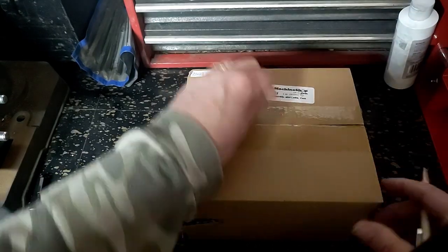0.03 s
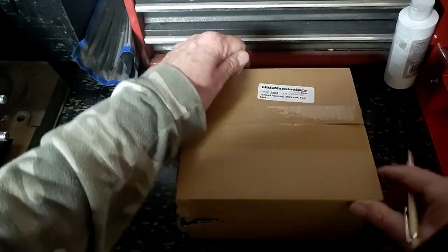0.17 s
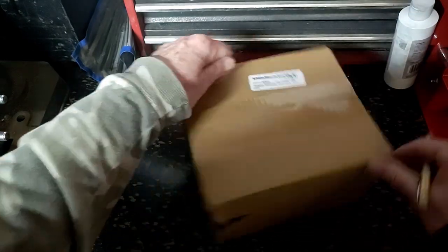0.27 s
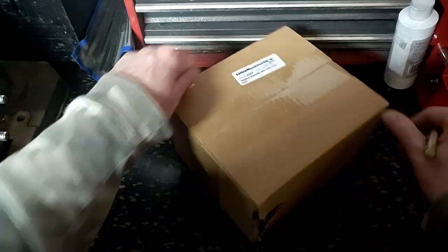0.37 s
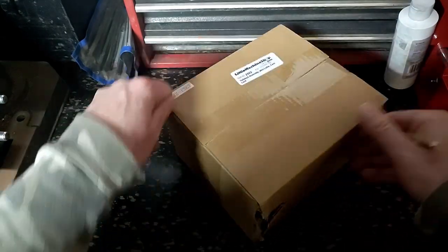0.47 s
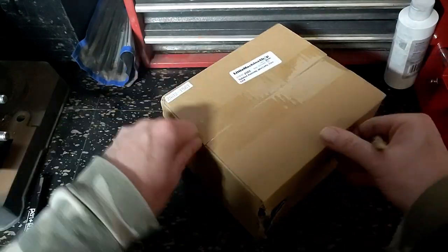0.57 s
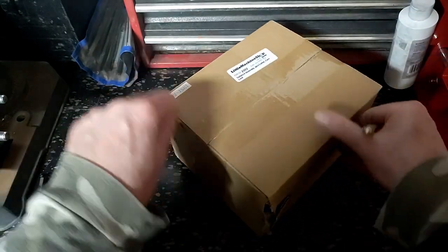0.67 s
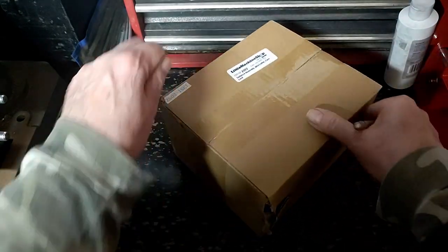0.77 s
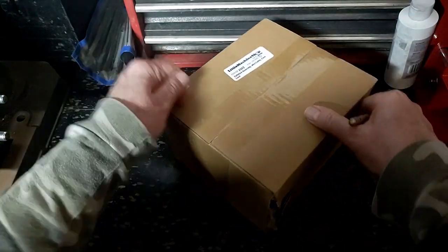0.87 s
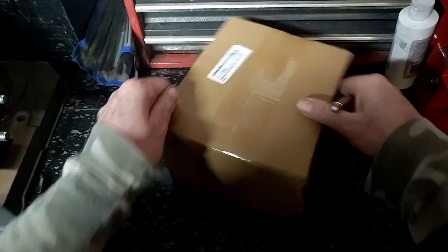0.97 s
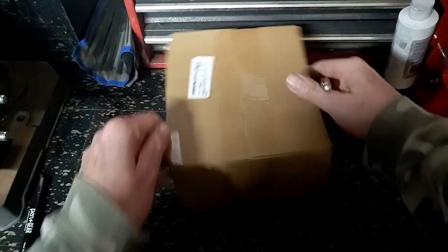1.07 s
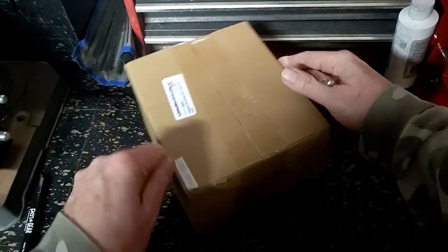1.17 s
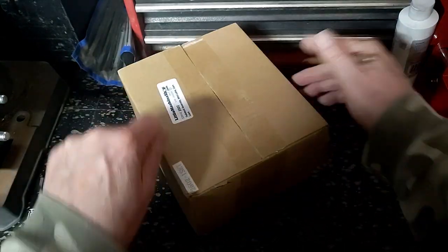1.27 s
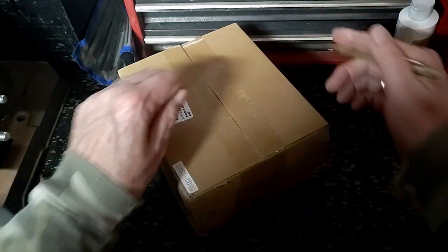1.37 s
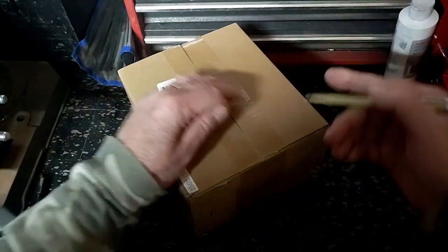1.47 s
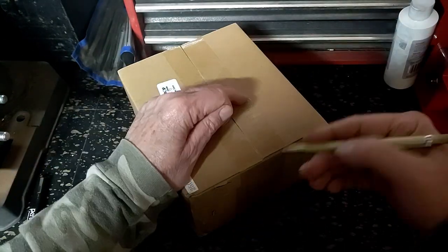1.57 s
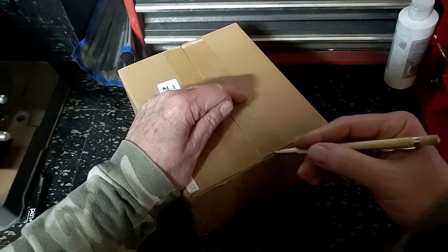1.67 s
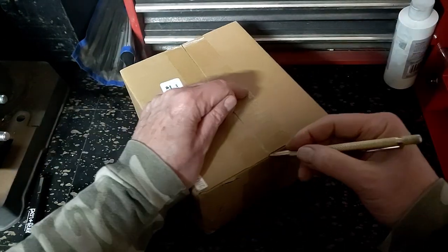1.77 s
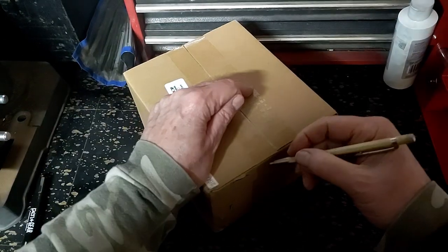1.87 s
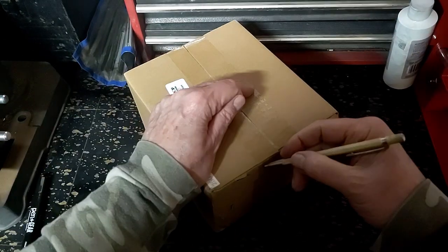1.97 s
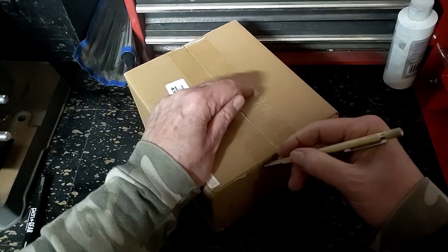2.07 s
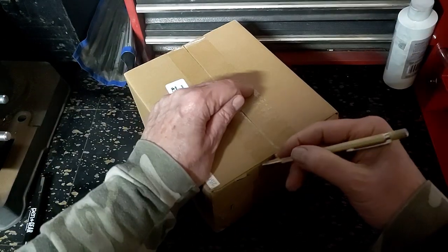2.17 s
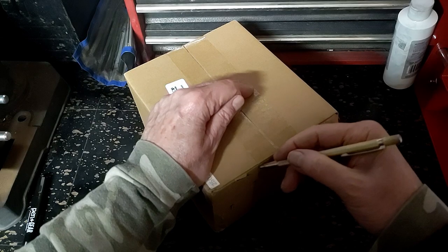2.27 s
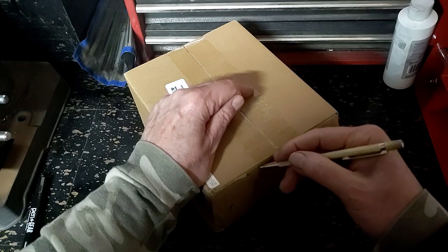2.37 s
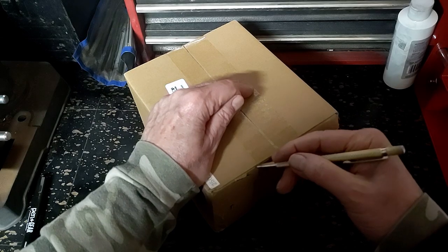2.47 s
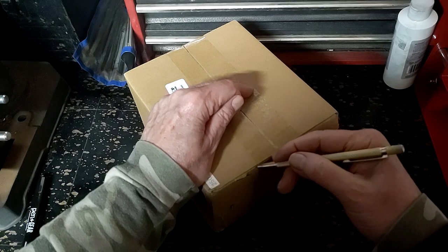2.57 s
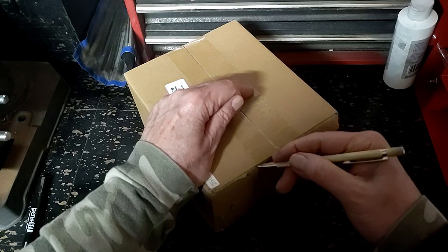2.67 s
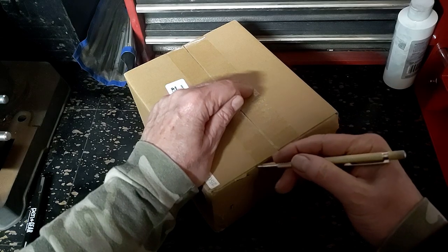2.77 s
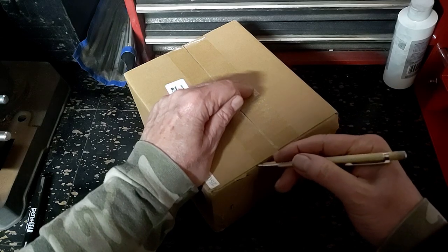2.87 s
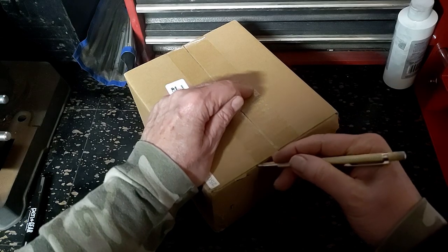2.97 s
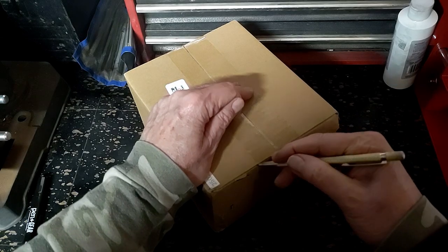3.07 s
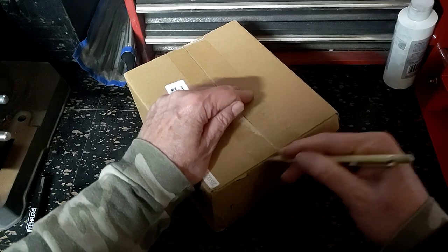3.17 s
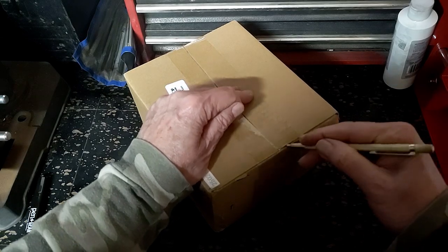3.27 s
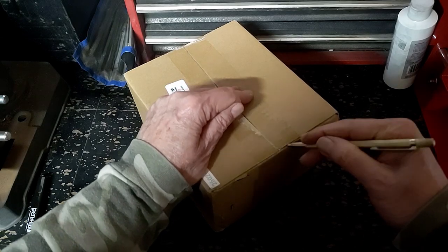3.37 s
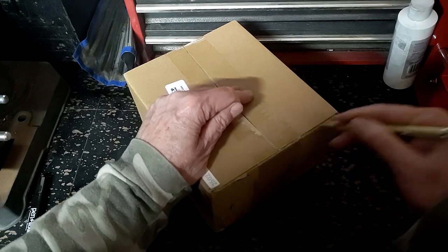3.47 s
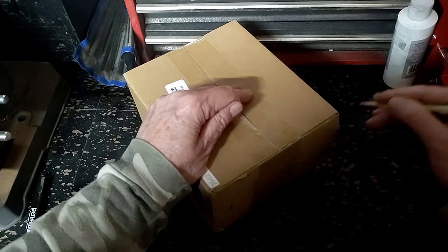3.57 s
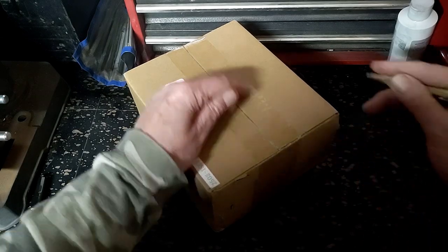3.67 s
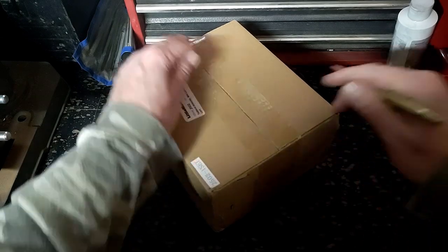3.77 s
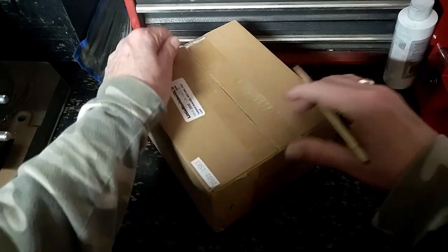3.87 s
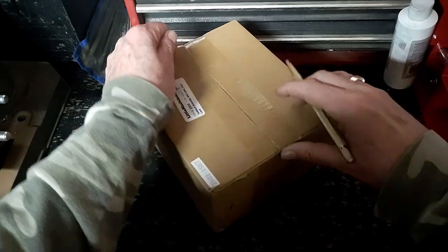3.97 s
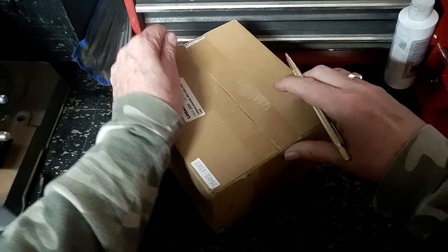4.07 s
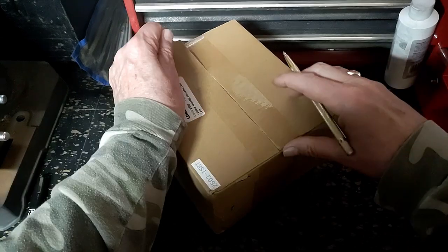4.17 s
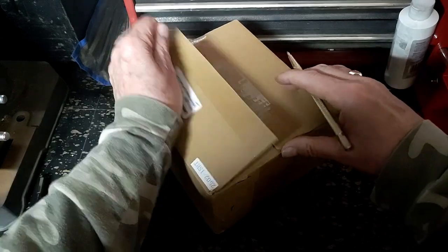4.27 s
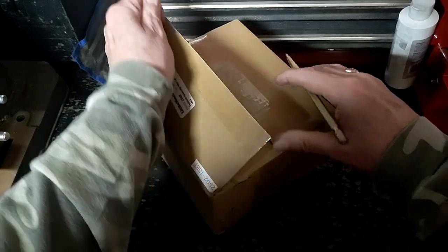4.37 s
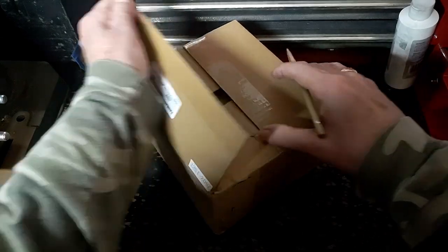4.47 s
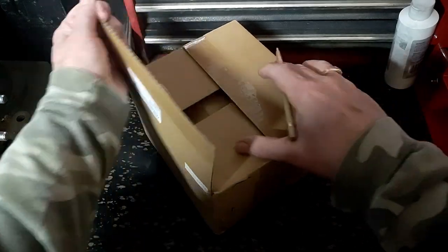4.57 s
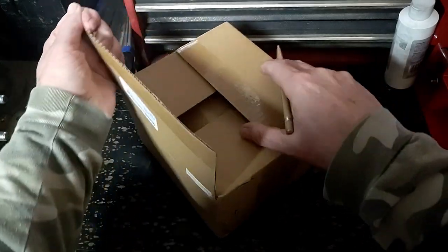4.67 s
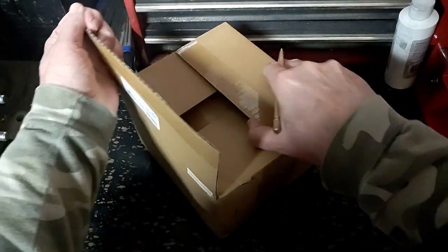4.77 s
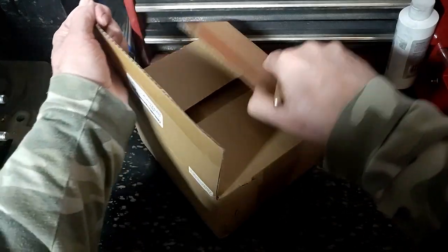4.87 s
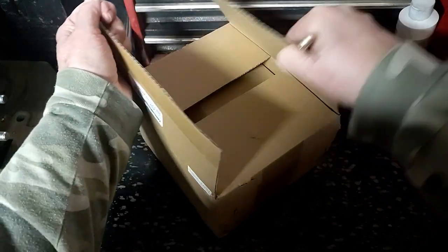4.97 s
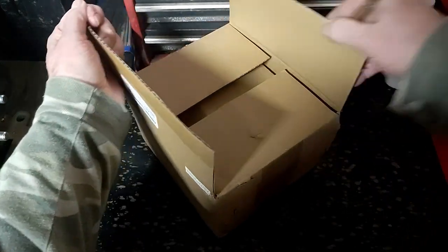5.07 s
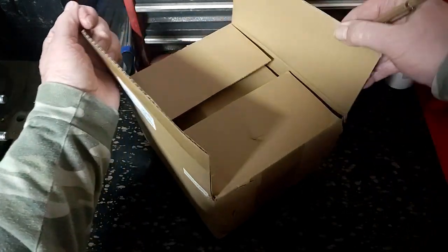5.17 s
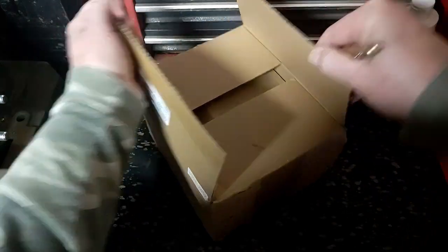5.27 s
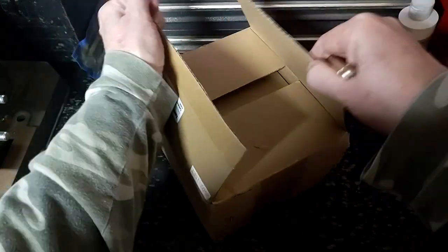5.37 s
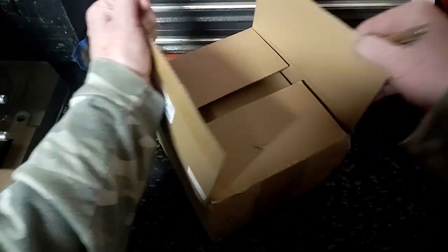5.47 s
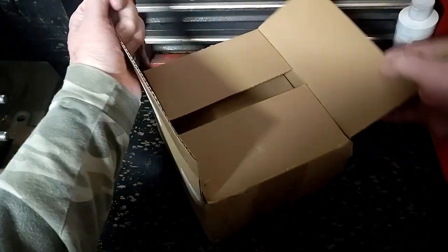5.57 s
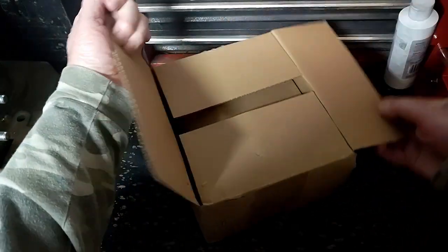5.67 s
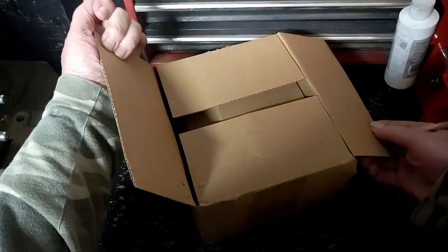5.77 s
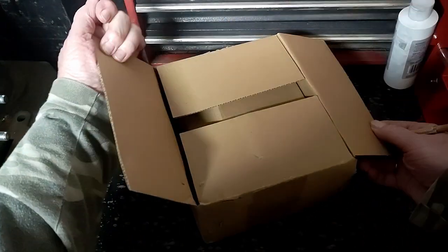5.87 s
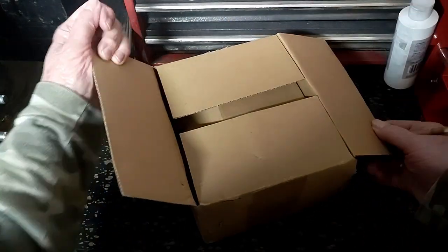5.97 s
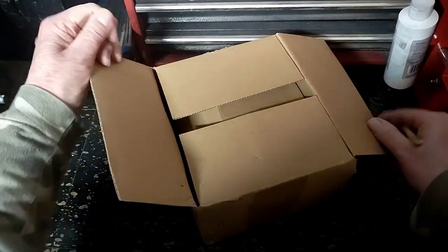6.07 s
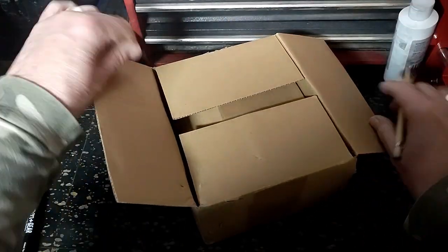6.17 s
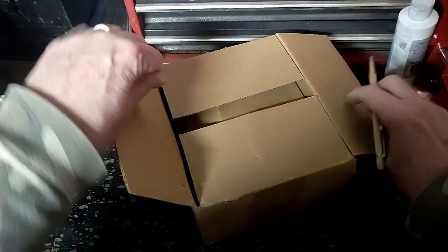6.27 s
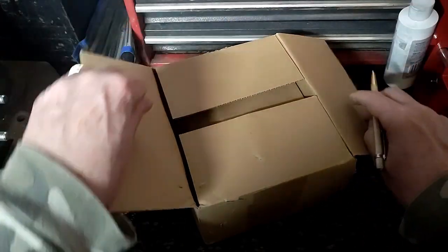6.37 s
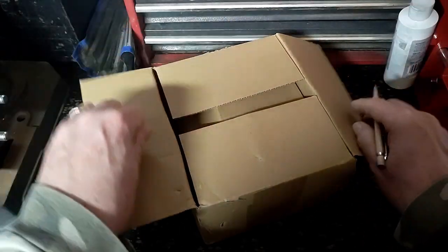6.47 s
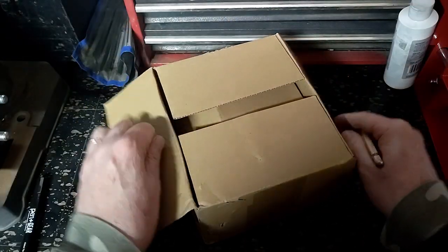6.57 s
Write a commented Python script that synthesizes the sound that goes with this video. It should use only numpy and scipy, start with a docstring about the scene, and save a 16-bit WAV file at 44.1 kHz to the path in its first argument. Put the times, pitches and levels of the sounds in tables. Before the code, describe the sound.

Hands turn a hollow carton on a bench mat: soft knocks and two broad swishing scrapes. Only faint ticks and low hum follow, until a brief grainy tape cut drums on the box. Then comes one bright crack of parting tape, loud cardboard pops as the flaps bend back, and dry skin and sleeve rubbing. Near microphones, short room reflections, treble leaning right.

```python
"""Over mains hum and still air, a cardboard box is knocked and shoved on a rubber mat: its modes ring, noise
hisses. A knife then drags through the packing tape: grainy noise with catches and a boom from the box. The last
strip snaps: bright noise bursts, short ringing and a thump through the open box. The flaps are bent open:
creases pop as decaying modes with cracks, while hands and sleeves rub over the board as shaped friction noise."""
import sys
import numpy as np
from scipy import signal
from scipy.fft import rfft, irfft, next_fast_len
from scipy.io import wavfile
from scipy.ndimage import uniform_filter1d

SR = 44100
rng = np.random.default_rng(int(sys.argv[2]) if len(sys.argv) > 2 else 0)


def int16_out(signal):
    """Quantize to a 16-bit WAV file."""
    q = np.round(np.clip(np.atleast_2d(signal).T, -1, 1) * 32767)
    wavfile.write(sys.argv[1], SR, q.astype(np.int16))


N = 291942

# Closed-box resonances. Each row: frequency in Hz, width in Hz, level in dB.
BOX_MODES = [(128, 27, -14), (186, 22, -5), (245, 47, -8.5), (344, 26, 0), (380, 29, -2.5), (471, 26, -8),
             (694, 47, -18)]
# Hiss of skin or an edge on board. Each row: frequency in Hz, relative level in dB.
SKIN_SPECTRUM = [(2060, -31), (3500, -7), (5130, -11.5), (5530, -4), (5970, -4), (9680, 0.5), (11700, -1),
                 (14900, -3.5), (16000, -6)]
# Knife pulls along the seam. Each row: start, attack, hold, release in seconds, then
# tearing and box boom in dB before trim.
KNIFE_PULLS = [(2.937, 0.065, 0.079, .15, -61, -69), (3.16, 0.02, 0.036, .03, -44.5, -39.5),
               (3.201, .035, 0.016, .02, -37, -29), (3.366, .13, 0.034, .02, -30, -23)]
# Stroke level at its start and end, dB under full: fine hiss, lower board sounds
HISS_EDGE_DB, BODY_EDGE_DB = 38, 25.5


def amp(db):
    """Decibels to gain."""
    return 10 ** (np.asarray(db) / 20)


def unit(x):
    """Scale to rms 1."""
    return x / np.sqrt(np.mean(x ** 2) + 1e-20)


def burst(x):
    """Scale as if all the energy filled 10 ms at rms 1."""
    energy = np.mean(np.sum(x ** 2, axis=-1))
    return x / np.sqrt(energy / (SR / 100) + 1e-20)


def along(points, hz):
    """Interpolate (Hz, value) points on a log frequency axis."""
    f, v = np.transpose(points)
    return np.interp(np.log(hz + 1), np.log(f + 1), v)


def strokes(table, order, edge_db):
    """Gain per sample from one dB column: bell-curve swell, hold, bell-curve release; powers add."""
    t, energy = np.arange(N) / SR, np.zeros(N)
    for start, attack, hold, release, *levels in table:
        before = (start + attack - t) / attack
        after = (t - start - attack - hold) / release
        easing = np.clip(np.maximum(before, after), 0, 2)
        energy += amp(levels[order] - edge_db * easing ** 2) ** 2
    return np.sqrt(energy)


def wobble(rate):
    """Random curve with rate knots a second."""
    knots = rng.standard_normal(int(N * rate / SR) + 2)
    return np.interp(np.arange(N) * rate / SR, np.arange(len(knots)), knots)


def filtered(x, response):
    """Multiply the spectrum of x by a response of frequency."""
    n = x.shape[-1]
    m = next_fast_len(n + 8192)
    return irfft(rfft(x, m) * response(np.fft.rfftfreq(m, 1 / SR)), m)[..., :n]


def coloured(x, spectrum, size=2048):
    """Apply a causal minimum-phase filter, its cepstrum folded onto positive time."""
    gain = amp(along(spectrum, np.fft.rfftfreq(size, 1 / SR)))
    cepstrum = irfft(np.log(np.maximum(gain, 1e-6)))
    cepstrum[1:size // 2] *= 2
    cepstrum[size // 2 + 1:] = 0
    impulse = irfft(np.exp(rfft(cepstrum)))
    return signal.oaconvolve(x, impulse[None], axes=1)[:, :x.shape[-1]]


def add(track, s, x):
    """Mix x into the track at time s."""
    start = max(round(s * SR), 0)
    track[:, start:start + x.shape[-1]] += x[..., :N - start]


def leaning(pair, lean):
    """Tilt left against right by frequency, keeping their mean gain."""
    sides = lambda hz: amp(np.outer([.5, -.5], along(lean, hz)))
    return filtered(pair, lambda hz: sides(hz) / sides(hz).mean(axis=0))


def spread(pair):
    """Turn two unrelated signals into left and right: most alike near 400 Hz, treble to the right."""
    # Each row: frequency in Hz, left-right correlation.
    alike = [(50, -0.5), (150, 0.84), (400, 1), (700, 0.63), (2000, 0.23), (5000, 0.02), (12000, 0.08)]
    # Each row: frequency in Hz, left minus right in dB.
    lean = [(60, 6.5), (110, 5.5), (200, 0), (700, 0), (1300, -2), (2400, -4), (4400, -1), (6000, -1.5),
            (8000, -11.5), (15000, -15)]
    turn = lambda hz: np.arccos(np.clip(along(alike, hz), -1, 1)) / 2
    mid, side = filtered(pair, lambda hz: np.array([np.cos(turn(hz)), np.sin(turn(hz))]))
    return leaning(np.array([mid + side, mid - side]), lean)


def friction(rate, grain_db, clump_db, clump_rate):
    """Fibres catch and let go: uneven slips (rate a second) over fine hiss, swelling in clumps."""
    at = np.flatnonzero(rng.random(N) < rate / SR)
    noise, grains = rng.standard_normal((2, N)), np.zeros((2, N))
    size_db = 4 * np.minimum(rng.exponential(size=len(at)), 2)
    grains[:, at] = noise[:, at] * amp(size_db)
    clumps = amp(clump_db * wobble(clump_rate))
    return unit((noise + amp(grain_db) * unit(grains)) * clumps)


def patchy(x, depth_db):
    """The contact wanders over the board, so the colour shifts from moment to moment."""
    z = signal.stft(x, nperseg=512)[2]
    field = rng.standard_normal(z.shape[1:])
    for axis in (0, 1):
        field = uniform_filter1d(field, size=9, axis=axis)
    return signal.istft(z * amp(depth_db * unit(field)), nperseg=512)[1][:, :N]


def puff(t, rise, fall):
    """Two noises that swell and die, time constants in seconds."""
    return rng.standard_normal((2, len(t))) * (1 - np.exp(-(t / rise) ** 2)) * np.exp(-t / fall)


def ringing_on(gain, t60):
    """Let a gain die away no faster than 60 dB in t60 seconds."""
    fall = np.log(1000) * np.arange(N) / SR / t60
    return np.exp(np.maximum.accumulate(np.log(gain + 1e-12) + fall) - fall)


def drumming(slips):
    """Friction drives the closed box's panel resonances, neighbours in opposite phase."""
    def box(f):
        response = 0
        for k, (centre, width, db) in enumerate(BOX_MODES):
            damping = 1j * f * width
            response = response + (-1) ** k * amp(db) * damping / (centre ** 2 - f ** 2 + damping)
        return response
    tone = [(50, -4.0), (130, -0.5), (700, 1.5), (1500, -14.0), (5000, -51)]  # (Hz, dB)
    return unit(coloured(filtered(slips, box), tone))


def blows(events, modes, focus_db, knock_db, crack_db, tick_db, tick_growth, fall):
    """Each blow rings the modes, most near one resonance, while the crushed board cracks and ticks."""
    # Small panels radiate little bass. Each row: frequency in Hz, gain in dB.
    bass = [(25, -31.5), (60, -18), (110, 1.5), (170, 0.5)]
    # Crushed fibres. Each row: frequency in Hz, relative level in dB.
    crack_spectrum = [(400, -8.5), (700, -1), (1000, -7.5), (1300, -2.5), (1550, -9), (1850, -1),
                      (2250, -3), (2750, -3), (3400, -16), (4100, -8.5), (4900, -16.5), (7000, -21.5),
                      (12000, -41.5)]
    # Treble tick. Each row: frequency in Hz, relative level in dB.
    tick_spectrum = [(3500, -26), (7000, -5), (10000, -1.5), (15500, -11)]
    body, surface, t = np.zeros((2, N)), np.zeros((2, N)), np.arange(SR // 4) / SR
    hz, level, t60 = np.transpose(modes)[:, :, None]
    signs = (-1) ** np.arange(len(hz))[:, None]  # neighbouring modes start opposite ways
    swing = np.sin(2 * np.pi * hz * t) * signs
    for s, knock, crack, centre_hz in events:
        strength = level + rng.normal(0, 1, hz.shape) - focus_db * np.abs(np.log2(hz / centre_hz))
        ring = np.sum(amp(strength - 60 * t / t60) * swing, axis=0) * (1 - np.exp(-t / 0.00067))
        add(body, s, amp(knock + knock_db) * burst(ring) * np.array([[1], [0]]))  # mid signal only
        settling = amp(-12) * puff(t, 0.0014, 0.0078)  # fibres settle after the crack
        crush = puff(t, 0.0011, fall) + settling
        add(surface, s, amp(crack + crack_db) * burst(coloured(crush, crack_spectrum)))
        tick = tick_growth * crack + tick_db  # a harder crack brings a louder tick
        add(surface, s, amp(tick) * burst(coloured(puff(t, 0.00044, fall), tick_spectrum)))
    return coloured(body, bass) + surface


def workshop(x, wet_db):
    """Add the room's short answer: a noise tail, each frequency dying at its own speed."""
    # Each row: frequency in Hz, t60 in seconds.
    decay = [(150, 0.14), (1000, 0.39), (4500, 0.24), (14000, 0.22)]
    hz, t, z = signal.stft(rng.standard_normal((2, SR // 2)), SR, nperseg=256)
    tail = signal.istft(z * amp(-60 * t / along(decay, hz)[:, None]), SR, nperseg=256)[1]
    tail = np.pad(tail / np.linalg.norm(tail[0]), ((0, 0), (SR // 300, 0)))  # 1/300 s predelay
    return x + amp(wet_db) * signal.fftconvolve(x, tail, axes=1)[:, :N]


def background():
    """Still air as coloured noise, part shared by both sides, plus a steady mains hum sine."""
    # Each row: frequency in Hz, relative level in dB.
    air_spectrum = [(25, -27), (70, 4), (280, -1), (400, -1), (560, -11), (1200, -15), (2200, -26.5),
                    (5000, -23.5), (15500, -35.5)]
    air_db, hum_hz, hum_db = -68.5, 120.2, -57.5
    air = unit(coloured(rng.standard_normal((3, N)), air_spectrum))
    hum = np.sqrt(2) * np.sin(2 * np.pi * hum_hz * np.arange(N) / SR)
    return amp(air_db) * (air[0] + amp(4.0) * air[1:]) + amp(hum_db) * hum


def flexing():
    """Low-pitched friction noise makes the loaded walls groan, louder at the mic nearer the pressing hand."""
    # Each row: start, attack, hold, release in seconds, left and right groan in dB before trim.
    presses = [(2.78, 0.068, .55, 0.38, -43, -64), (3.16, .085, 0.011, .06, -33, -34),
               (3.39, 0.11, .03, .14, -42, -39), (4.23, 0.021, 0.15, .07, -49, -45),
               (4.54, .11, 0.044, 0.23, -42, -53), (4.81, 0.026, .03, 0.2, -35, -39),
               (5.13, 0.038, 0.2, .12, -55.5, -50), (5.44, .07, .13, 0.27, -49, -45),
               (5.635, 0.04, .01, .05, -42, -44), (6.11, .06, .4, 0.12, -57.5, -64)]
    # Each row: frequency in Hz, relative level in dB.
    groan = [(22, -32.5), (55, -15), (100, 2), (175, -1.5), (255, -3), (400, -18), (800, -35), (2000, -72)]
    slips = friction(rate=490, grain_db=-2.0, clump_db=1.4, clump_rate=21)
    left = strokes(presses, order=0, edge_db=31)
    right = strokes(presses, order=1, edge_db=32)
    return amp(1.5) * np.array([left, right]) * unit(spread(coloured(slips, groan)))


def scuffs():
    """A fingertip or an edge skids briefly over the board: a coloured noise puff."""
    # Each row: start in seconds, level in dB, rise and fall time constant in seconds.
    skids = [(.110, -39, .005), (0.179, -45, .0018), (0.449, -31.5, .002), (2.411, -62, 0.0062),
             (3.688, -47, 0.01), (4.357, -33.5, 0.016), (4.874, -39, 0.0026), (5.491, -49, 0.0029),
             (6.17, -38, 0.0046), (6.284, -28, 0.0089), (6.501, -32.5, 0.0019), (6.54, -36, .002)]
    track, t = np.zeros((2, N)), np.arange(SR // 6) / SR
    for s, db, length in skids:
        add(track, s, amp(db) * burst(coloured(puff(t, length, length), SKIN_SPECTRUM)))
    return track


def rubbing():
    """Skin and sleeves hiss on the flaps; board on board rasps in coarser, clumped slips."""
    # Each row: start, attack, hold, release in seconds, hiss and rasp in dB before trim.
    rubs = [(0, 0.004, 0.0042, 0.033, -29.5, -39.5), (.09, 0.026, 0.0078, 0.033, -41.5, -44.5),
            (1.15, 0.11, 0.86, 0.4, -72.5, -74), (3.65, 0.054, 0.059, 0.17, -49.5, -58),
            (3.75, 0.11, 3.7, 0.11, -59.5, -59.5), (4.22, 0.026, 0.14, 0.063, -51, -49),
            (4.38, 0.083, 0.18, .08, -43.5, -64), (4.56, 0.096, 0.087, 0.079, -44, -49),
            (4.825, 0.026, 0.049, .1, -41, -43.5), (4.97, 0.052, 0.029, 0.21, -46.5, -57),
            (5.13, 0.041, 0.21, .1, -46, -50.5), (5.24, 0.065, .01, 0.053, -40.5, -44),
            (5.43, 0.06, 0.19, 0.18, -46.5, -48.5), (5.54, 0.12, 0.062, 0.054, -41, -44.5),
            (5.93, .14, 0.22, 0.093, -49, -63), (6.15, .14, 0.0089, 0.05, -32, -40.5),
            (6.3, .065, 0.0085, .04, -34, -42), (6.36, 0.064, 0.11, 0.17, -43.5, -52.5)]
    # Each row: frequency in Hz, relative level in dB.
    rasp_spectrum = [(110, -31), (200, -9), (260, -0.5), (430, -2), (520, -5.5), (720, -6.5), (880, -11.5),
                     (1000, -16), (1200, -10), (1550, -11), (2100, -5), (2700, -8.5), (3500, -13.5),
                     (5000, -12), (8000, -48)]
    fine = patchy(friction(rate=450, grain_db=-12, clump_db=1.7, clump_rate=150), depth_db=1.0)
    coarse = friction(rate=160, grain_db=-2.5, clump_db=2.2, clump_rate=110)
    hiss = strokes(rubs, order=0, edge_db=HISS_EDGE_DB) * unit(coloured(fine, SKIN_SPECTRUM))
    rasp = strokes(rubs, order=1, edge_db=BODY_EDGE_DB) * unit(coloured(coarse, rasp_spectrum))
    return amp(1.5) * hiss + amp(1.58) * rasp


def sliding():
    """The box's bottom hisses over the mat and scrapes more coarsely; its panels murmur along."""
    # Each row: start, attack, hold, release in seconds, hiss, scrape and murmur in dB before trim.
    shoves = [(.165, 0.17, 0.013, 0.13, -26.5, -40, -52), (.435, 0.027, 0.047, 0.067, -36.5, -46, -45.5),
              (.552, 0.017, 0.051, 0.086, -41.5, -48.5, -48.5),
              (.665, 0.038, 0.074, 0.027, -48, -54.5, -57.5), (.815, 0.21, 0.12, .115, -26.5, -36.5, -51),
              (1.44, 0.048, 0.072, 0.092, -58.5, -59, -69.5), (1.64, .16, 0.043, 0.14, -49, -56, -70.5)]
    # Fine hiss. Each row: frequency in Hz, relative level in dB.
    mat = [(2500, -35.5), (4500, -9.5), (6200, -3), (8500, -2.5), (11000, -4), (15300, -6), (16000, -23.5)]
    # Coarse scrape. Each row: frequency in Hz, relative level in dB.
    scrape_spectrum = [(350, -15), (550, -10), (800, -12), (1300, -4.5), (1650, -4), (2100, 0.5),
                       (2500, -1.5), (3200, 2.5), (4500, 0.5), (6500, -11), (11000, -26)]
    fine = patchy(friction(rate=1900, grain_db=-12, clump_db=1.5, clump_rate=73), depth_db=2.2)
    slips = friction(rate=1600, grain_db=-6, clump_db=1.4, clump_rate=130)
    hiss = strokes(shoves, order=0, edge_db=HISS_EDGE_DB) * unit(coloured(fine, mat))
    scrape = strokes(shoves, order=1, edge_db=BODY_EDGE_DB) * unit(coloured(slips, scrape_spectrum))
    murmur = strokes(shoves, order=2, edge_db=BODY_EDGE_DB) * drumming(slips)
    return hiss + amp(-0.9) * scrape + amp(-1.0) * murmur


def knocks():
    """Hands and knife bump the closed box; a mode's width sets how long it rings."""
    # Each row: start in seconds, knock and crack in dB before trim, strongest resonance in Hz.
    bumps = [(.010, -28.5, -26.5, 317), (.480, -41.5, -40.5, 370), (.565, -35, -43, 427),
             (.885, -38, -34.5, 230), (1.5215, -38, -43, 406), (1.984, -49, -56, 393),
             (2.273, -53.5, -66, 380), (2.415, -56, -60.5, 232), (2.514, -42, -59.5, 400),
             (2.817, -43, -61, 650), (3.174, -36, -48, 210), (3.2255, -25, -37, 350),
             (3.455, -30, -30.5, 300), (3.494, -16.5, -47, 340), (3.528, -22.5, -27.5, 358),
             (3.687, -46.5, -79, 360), (4.096, -47, -61.5, 306), (4.139, -49, -45.5, 254)]
    modes = [(hz, db, np.log(1000) / (np.pi * width)) for hz, width, db in BOX_MODES]
    return blows(bumps, modes, focus_db=7.0, knock_db=0.34, crack_db=-2.56,
                 tick_db=1.5, tick_growth=1.108, fall=0.001)


def catches(tear):
    """The blade catches on the tape's fibres at uneven spacing and strength, following the tear."""
    gap_s, level_db, scatter_db = .011, -7, 3  # mean gap; level over the untrimmed tear
    track, t = np.zeros((2, N)), np.arange(SR // 40) / SR
    times = KNIFE_PULLS[0][0] + np.cumsum(gap_s * rng.uniform(.6, 1.4, size=90))
    for s, db in zip(times, rng.normal(level_db, scatter_db, len(times))):
        click = burst(coloured(puff(t, .0005, .0008), SKIN_SPECTRUM, size=256))
        add(track, s, amp(db) * tear[round(s * SR)] * click)
    return track


def cutting():
    """The blade tears the tape in small jerks; friction drums on the closed box, which rings on."""
    # Each row: frequency in Hz, relative level in dB.
    tear_spectrum = [(350, -38), (600, -10.5), (688, -3.5), (984, -3), (1180, -5.5), (1700, -5.5),
                     (1850, -5.5), (2150, -13.5), (2760, -3), (3830, -13.5), (5120, -15.5), (9760, -12.5),
                     (12500, -13), (14900, -12), (16000, -31)]
    jerks = patchy(friction(rate=700, grain_db=-1, clump_db=3, clump_rate=260), depth_db=1.5)
    shudder = friction(rate=940, grain_db=-8, clump_db=0.3, clump_rate=66)
    tear = strokes(KNIFE_PULLS, order=0, edge_db=43)
    boom = ringing_on(strokes(KNIFE_PULLS, order=1, edge_db=46), t60=0.14)
    tearing = amp(0.2) * tear * unit(coloured(jerks, tear_spectrum))
    return tearing + catches(tear) + amp(1.4) * boom * drumming(shudder)


def pops():
    """The tape's last snap thumps the open box; then creases give way and flaps slip past each other, ringing
    it."""
    # Each row: start in seconds, knock and crack in dB before trim, strongest resonance in Hz. # The first row
    # is the tape's last snap thumping the box; the others are creases and flaps.
    flap_hits = [(4.268, -33.5, -34.5, 230), (4.501, -50.5, -36, 290), (4.8315, -22, -23, 343),
                 (4.8402, -17, -15, 664), (4.860, -24.5, -35, 694), (4.872, -28.5, -38, 268),
                 (5.158, -18.5, -20.5, 410), (5.228, -31.5, -45, 403), (5.288, -46, -44.5, 270),
                 (5.314, -38, -40, 282), (5.487, -35, -38, 480), (5.514, -26, -32, 460),
                 (5.602, -37.5, -46, 450), (5.667, -28, -57, 324), (6.291, -34.5, -28.5, 410),
                 (6.543, -39, -43, 444)]
    # Open-box modes. Each row: frequency in Hz, level in dB, t60 in seconds.
    flap_modes = [(178, -3, 0.083), (265, -0.5, 0.058), (374, 0, 0.03), (408, -1.5, 0.057),
                  (470, -3.5, 0.026), (544, -15.5, 0.049), (685, -2, 0.063), (756, -5, 0.04),
                  (1240, -4, 0.046), (1300, -11.5, 0.038), (1870, 10.5, .04), (2190, 5, .04)]
    return blows(flap_hits, flap_modes, focus_db=11.0, knock_db=-1.5, crack_db=-2.3,
                 tick_db=-16.5, tick_growth=0.7, fall=0.0017)


def snaps():
    """Taut tape parts with a bright crack and a short ring, drawn separately for each side."""
    # Each row: start in seconds, level in dB.
    breaks = [(3.0075, -47), (3.051, -46), (4.142, -42), (4.228, -48.5), (4.245, -35), (4.2583, -20),
              (4.265, -11), (4.2672, -22.5)]
    # Crack. Each row: frequency in Hz, relative level in dB.
    tape_spectrum = [(200, -38), (450, -30), (700, -7.5), (1050, -18.5), (1450, -12.5), (1800, -3),
                     (2060, 2), (2450, -5), (3000, -12), (3550, -10), (4000, 0), (4450, 0.5), (4900, 1),
                     (7000, -10.5), (10800, -6.5), (16000, -18)]
    # Taut strip and the flap it holds. Each row: frequency in Hz, level in dB, t60 in seconds.
    tape_modes = [(2030, 0, .07), (3930, -9, .05), (4100, -7, .05), (4920, -7, .05), (5450, -11, .04),
                  (7120, -12, .04)]
    # Each row: frequency in Hz, left minus right in dB.
    tape_lean = [(200, 12.5), (2400, -1.5), (4400, -2), (8000, -3), (15000, -17)]
    ring_db = -10.5  # relative to the crack
    track, t = np.zeros((2, N)), np.arange(SR // 10) / SR
    hz, level, t60 = np.transpose(tape_modes)[:, :, None]
    for s, db in breaks:
        phase = rng.uniform(0, 2 * np.pi, (2, len(hz), 1))
        ring = np.sum(amp(level - 60 * t / t60) * np.sin(2 * np.pi * hz * t + phase), axis=1)
        crack = coloured(puff(t, 0.00054, 0.0031), tape_spectrum, size=256)
        add(track, s, amp(db) * (burst(crack) + amp(ring_db) * burst(ring)))
    crosstalk = 0.1 * track[::-1]  # each microphone catches part of the other's sound
    return leaning(track + crosstalk, tape_lean)


def scene():
    """All the handling at the bench, in the room."""
    contact = rubbing() + scuffs() + sliding() + knocks() + cutting() + pops()
    handling = spread(contact) + flexing()
    return background() + workshop(handling, wet_db=-14.5) + workshop(snaps(), wet_db=-13.5)


def record(dry):
    """Clip at full scale, then low-pass at 16.1 kHz with a 300 Hz wide slope."""
    top_hz, slope_hz = 16100, 300
    return filtered(np.clip(dry, -1, 1), lambda hz: np.clip((top_hz - hz) / slope_hz + .5, 0, 1))


dry = scene()
out = record(dry)
int16_out(out)
```